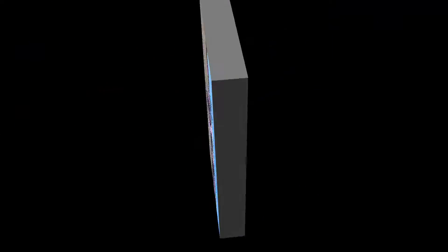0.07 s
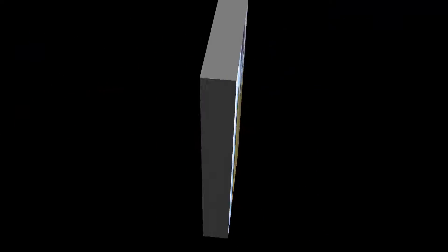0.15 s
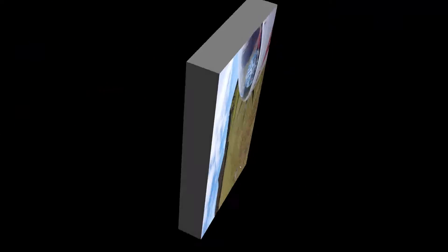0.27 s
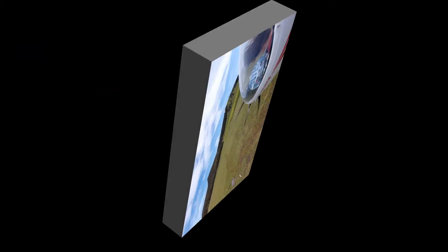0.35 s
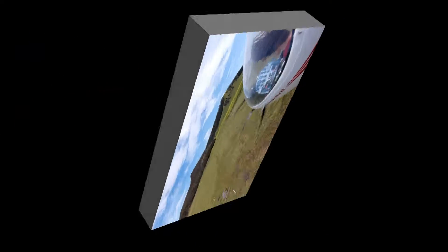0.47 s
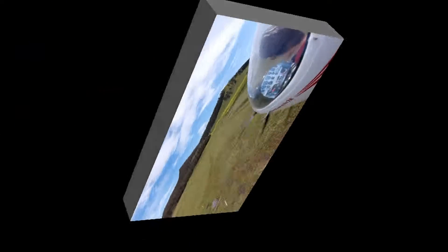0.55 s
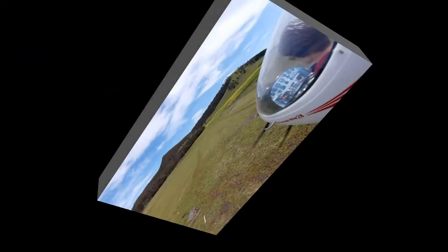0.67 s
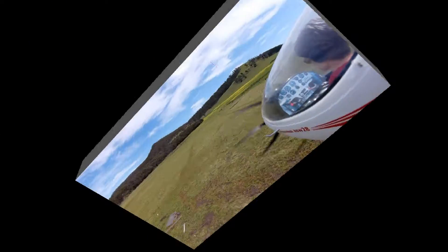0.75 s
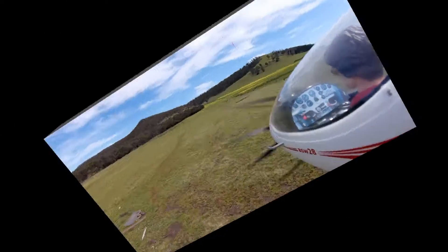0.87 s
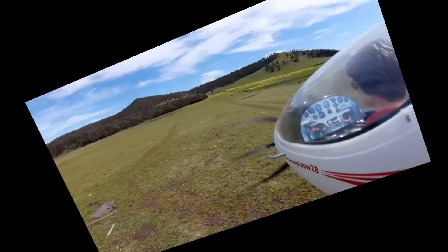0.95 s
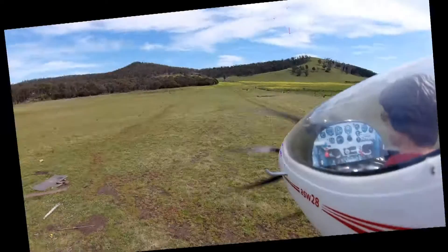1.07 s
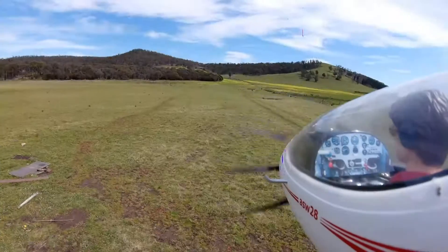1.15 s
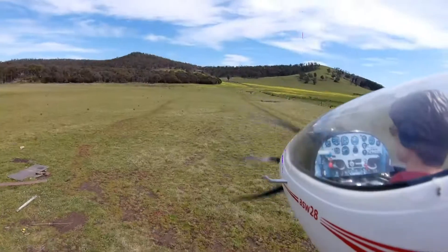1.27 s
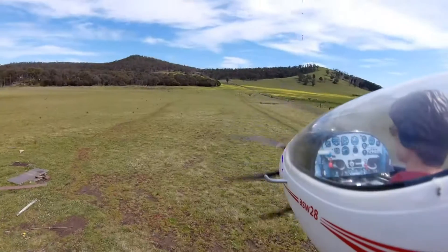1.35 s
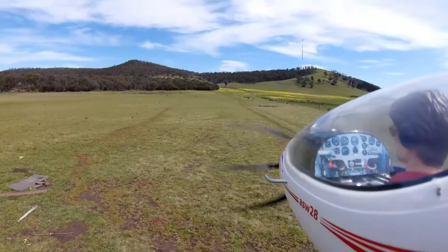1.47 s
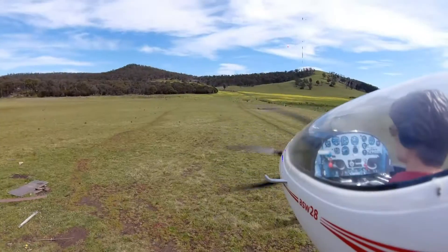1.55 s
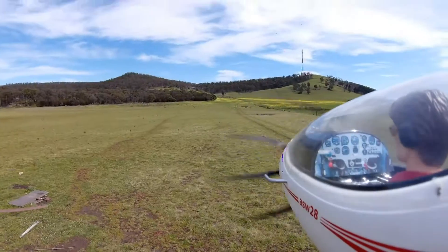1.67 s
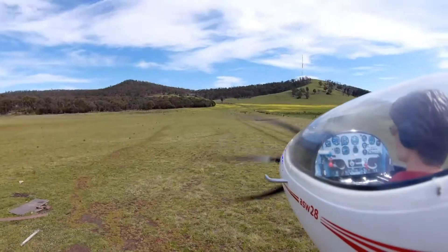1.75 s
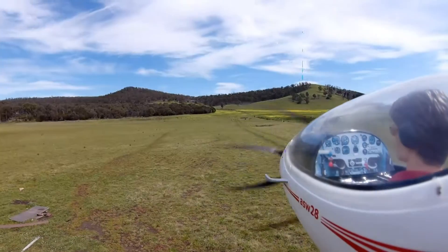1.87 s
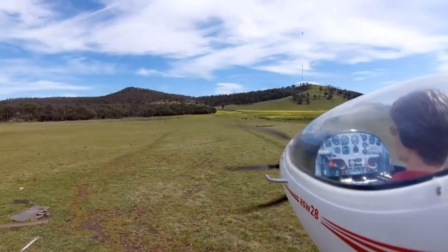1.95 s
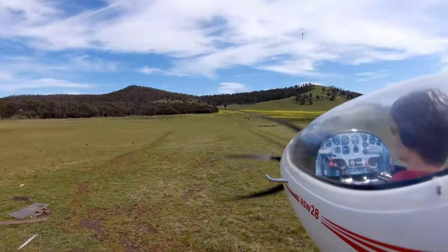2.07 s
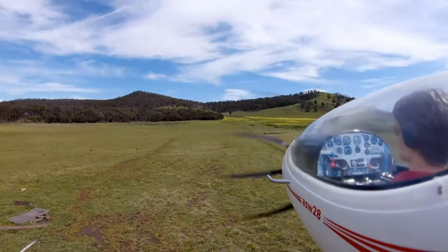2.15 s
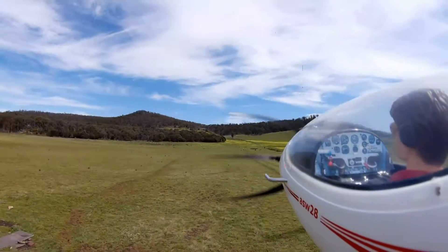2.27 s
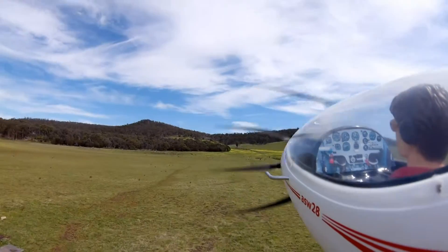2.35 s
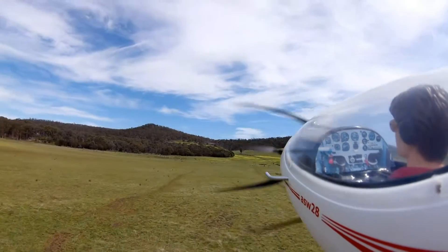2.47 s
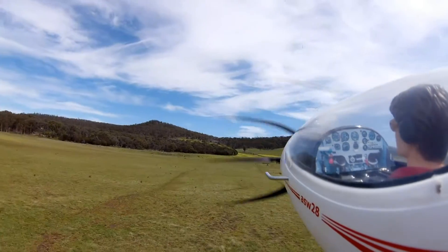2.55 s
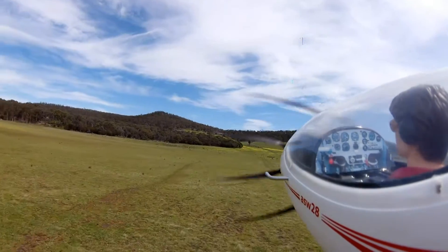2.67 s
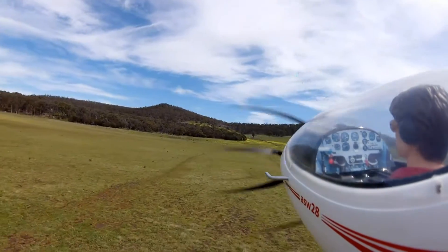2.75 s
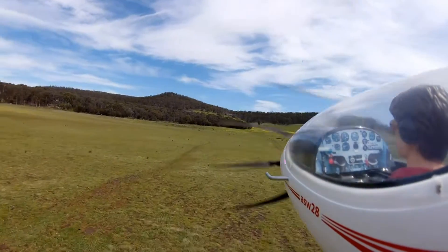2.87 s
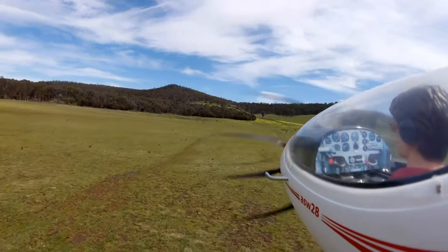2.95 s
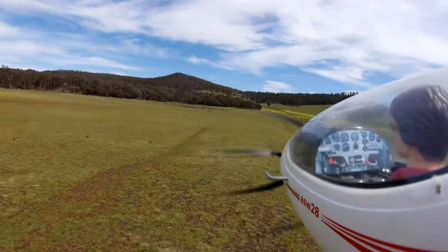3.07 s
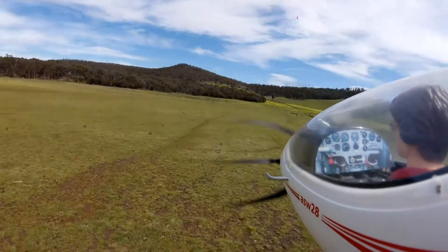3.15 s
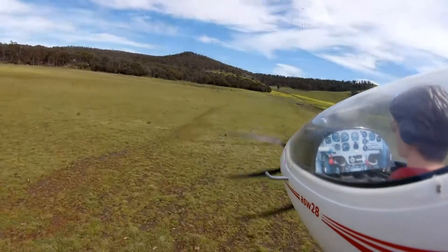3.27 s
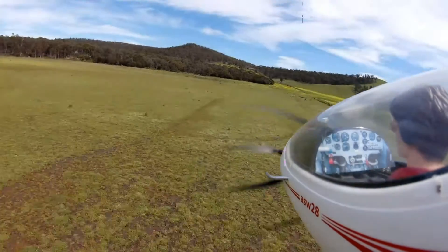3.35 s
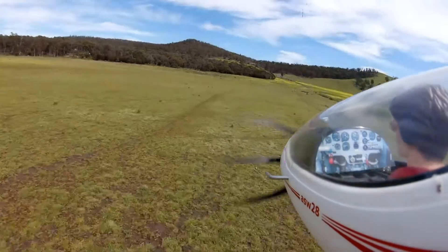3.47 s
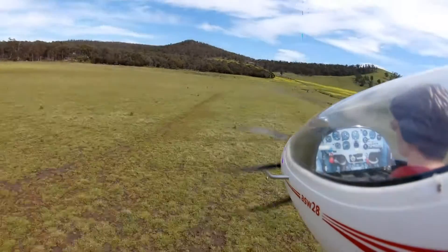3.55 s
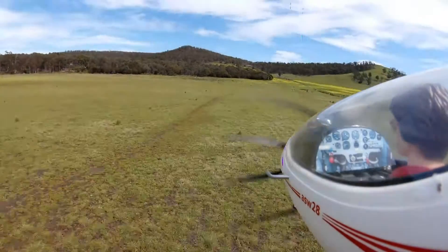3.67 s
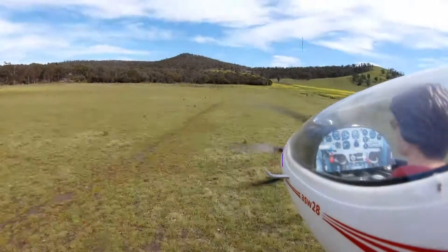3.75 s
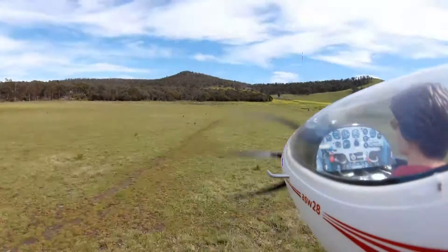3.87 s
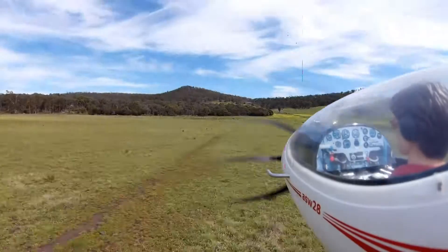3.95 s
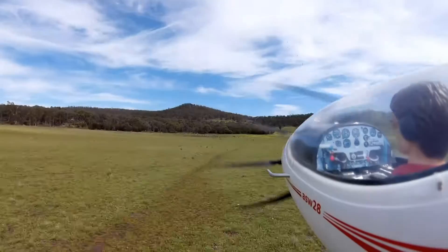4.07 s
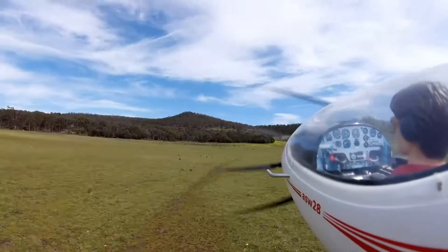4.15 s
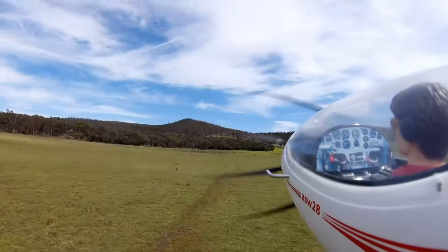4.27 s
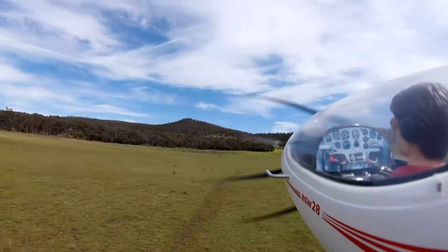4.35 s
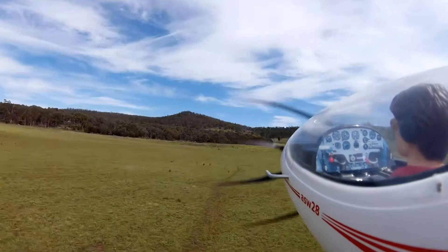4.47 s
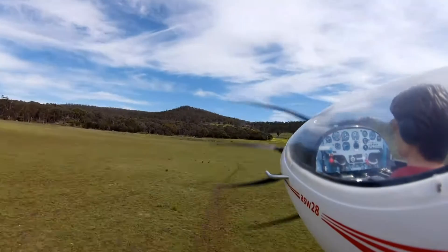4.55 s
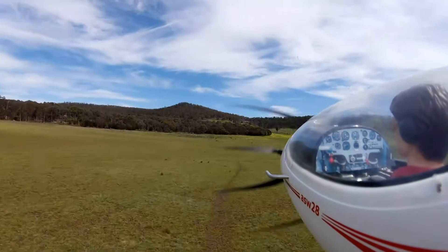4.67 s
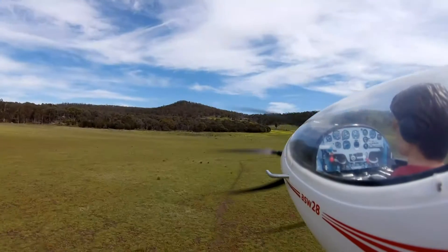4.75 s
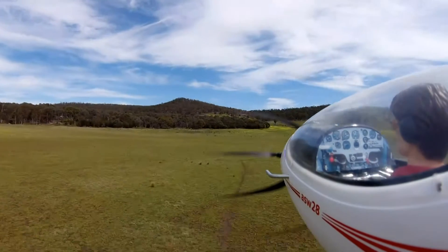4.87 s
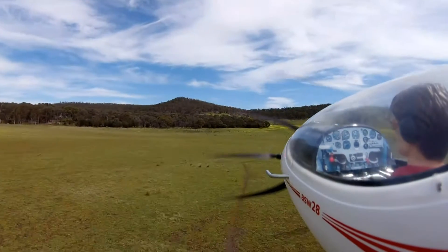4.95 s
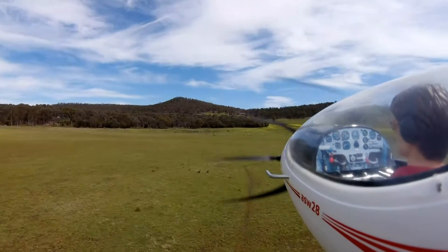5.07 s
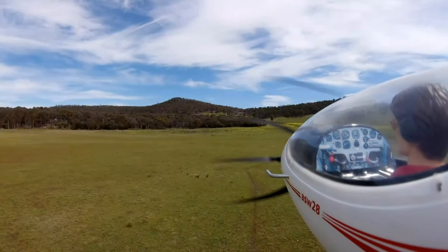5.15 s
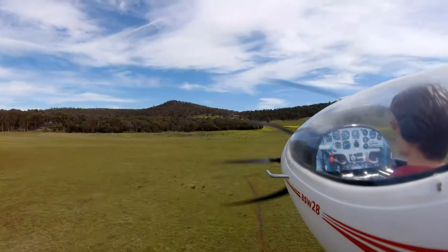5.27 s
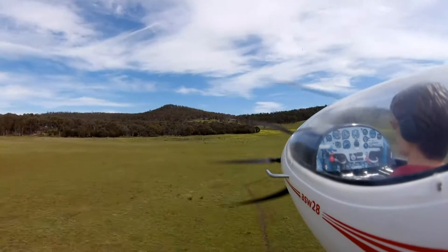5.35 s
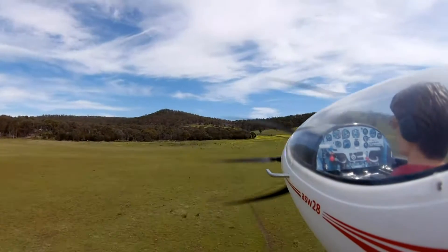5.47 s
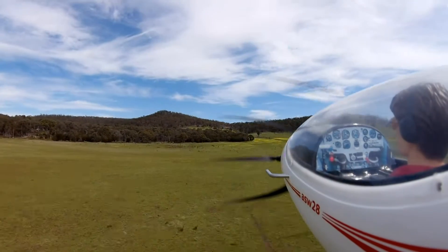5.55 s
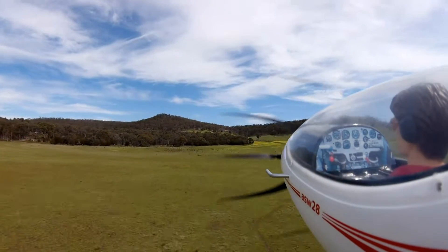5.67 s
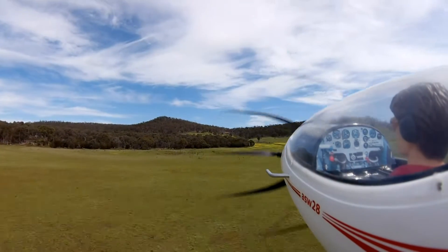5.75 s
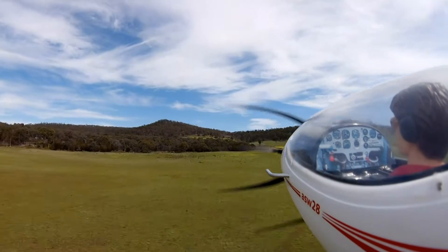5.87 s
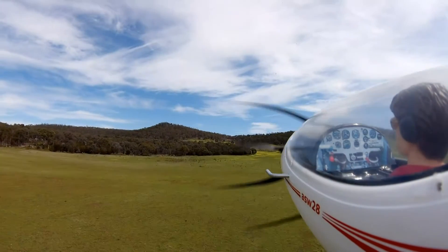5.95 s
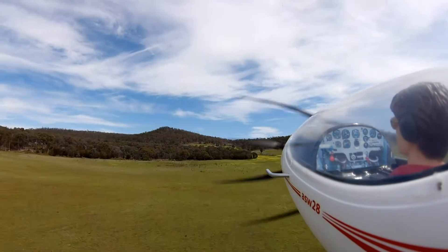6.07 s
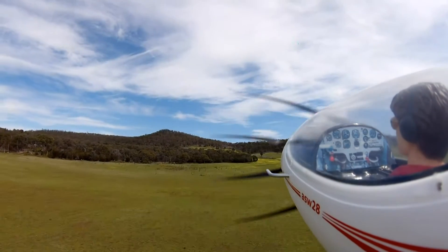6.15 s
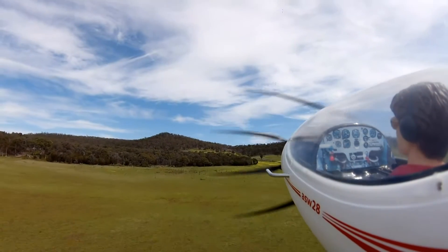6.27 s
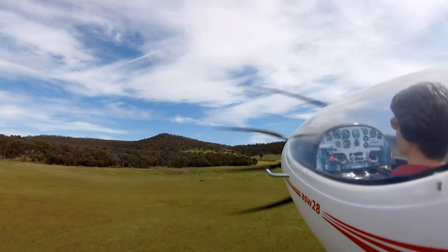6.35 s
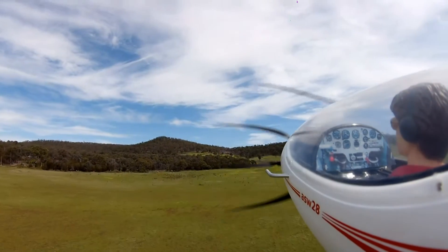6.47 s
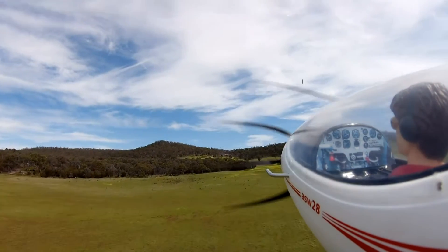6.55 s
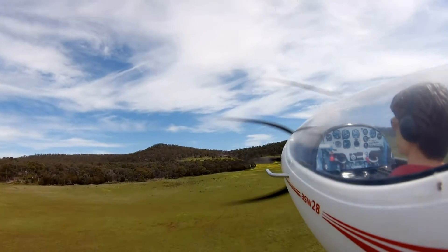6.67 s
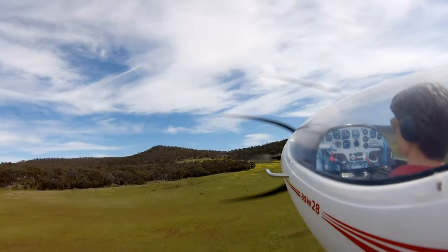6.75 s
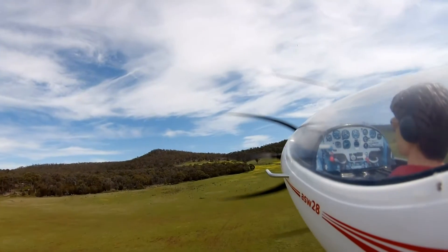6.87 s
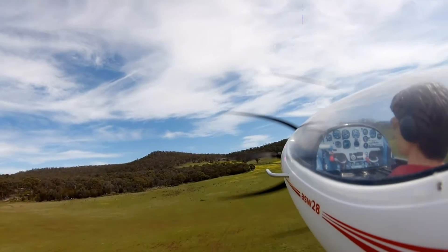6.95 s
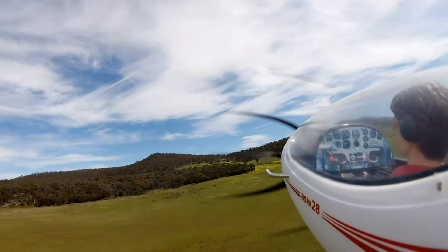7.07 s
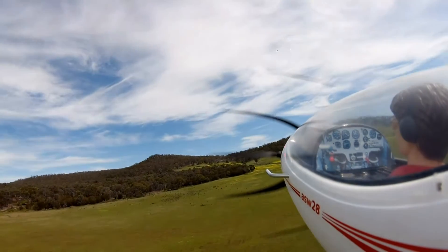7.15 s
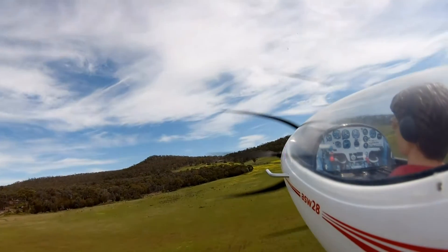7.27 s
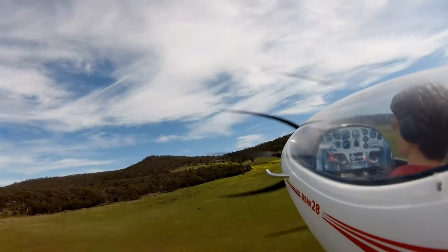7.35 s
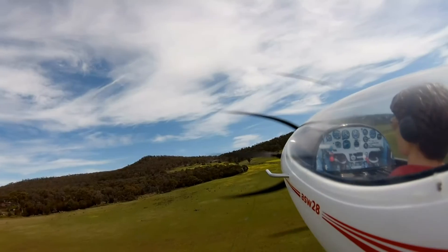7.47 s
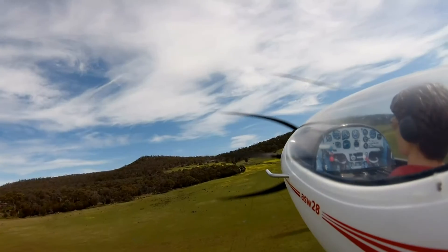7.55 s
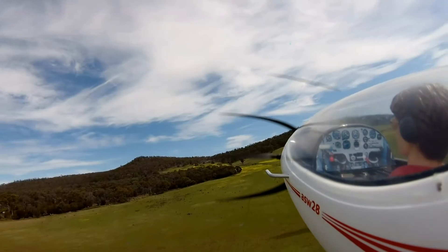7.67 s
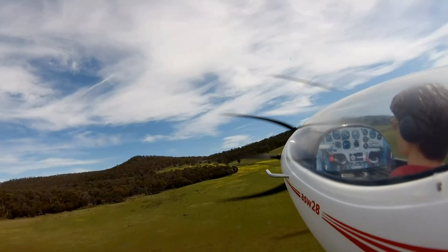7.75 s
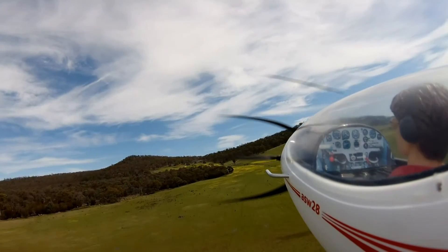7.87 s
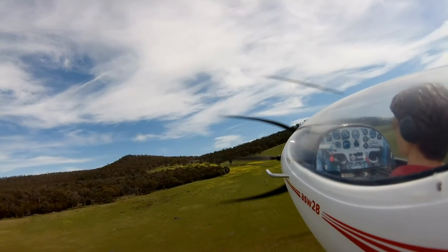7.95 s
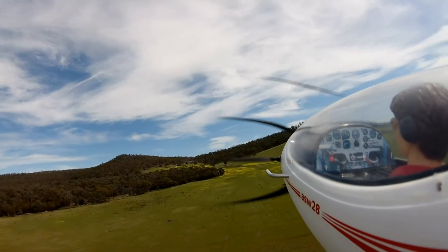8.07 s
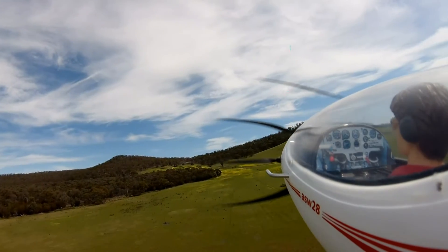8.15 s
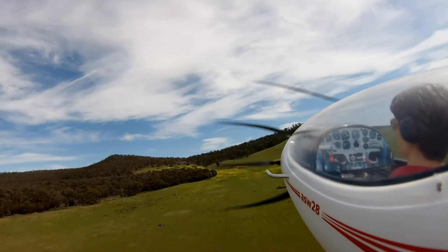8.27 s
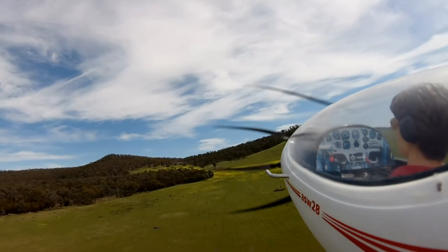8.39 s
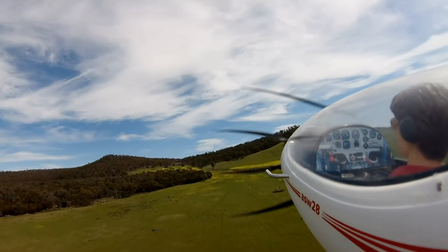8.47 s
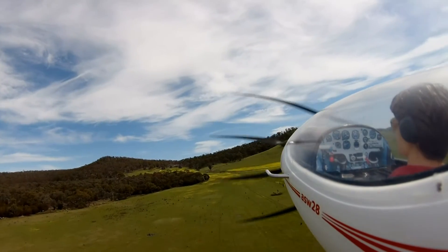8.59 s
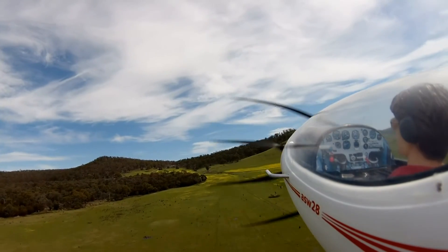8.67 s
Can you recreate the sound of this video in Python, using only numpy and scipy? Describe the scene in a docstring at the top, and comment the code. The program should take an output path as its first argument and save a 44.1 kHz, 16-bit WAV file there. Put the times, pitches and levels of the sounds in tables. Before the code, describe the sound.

A microphone on a model glider's wing, close to its electric propeller, outdoors over grass. From 0 to 2 seconds the stalled blades sputter: rough, lumpy puffs of mid-low noise at about 140 to 150 turns a second, with low flutter, irregular dull pops and bright cracks, densest near 1.5 and 2 seconds. A tiny tick falls near 1.1. Around 2.1 to 2.7 the blades grip, with a hard, rapid rattle and an emerging tone. By 2.9, with a faint soft thump, a harsh, bright buzz sets in at nearly constant pitch, with crisp snaps on top. Until 5.5 choppy gusts make it rasp and waver. It softens abruptly near 5.6 and again around 6.7 to 7, returning each time. Gusty rasp recurs near 6.35, 7.5, 7.8 and the end at 8.7. Blade-pulsed slipstream rush and light hiss continue throughout, above a faint shaft hum.

```python
"""A model glider's electric propeller pulls it off a grass field, heard from a microphone on the wing.
Stalled at first, the blades sputter in noisy puffs and pops; gathering speed they rattle with short cracks,
then settle into a buzz near 150 turns a second: summed orders of the shaft, with crisp tip snaps on top.
Behind it lies the slipstream's rush, noise pulsed by the blades in three bands, and a faint shaft hum.
Gusts roughen the buzz into a rasp; in smooth air it drops away for a moment. Two faint clicks are heard."""
import sys
import numpy as np
from scipy import signal
from scipy.fft import rfft, irfft
from scipy.io import wavfile
from scipy.ndimage import uniform_filter1d

SR = 44100
rng = np.random.default_rng(int(sys.argv[2]) if len(sys.argv) > 2 else 0)


def wav_out(sig):
    """Save sig, one row per channel (or a flat mono array), as 16-bit PCM at SR to the path in sys.argv[1]."""
    wavfile.write(sys.argv[1], SR, np.round(np.clip(np.atleast_2d(sig).T, -1, 1) * 32767).astype(np.int16))


N = 384552
TIME = np.arange(N) / SR  # s

SECOND_BLADE_TURNS = 0.533  # not quite opposite the first blade
PUSH_LAG_TURNS = 0.04  # the blade's smooth push, which makes the low orders, trails its slap


def blade_tones(turns, second, buffet, lull, delay, families, lean_rad=0.92, buffet_waver=0.047,
                dull_db_per_order=-2.5, buffet_turns=0.0052, odd_waver=0.46, sway_turns=0.0048,
                lurch_turns=0.0072, waver=0.11, rough=0.019, shimmer=0.044, lowest_hz=130):
    """Two slaps a turn, unevenly spaced, set odd orders beside even; a late slap shifts high orders most."""
    # eddies meet the blades early or late
    angle = turns + (sway_turns + buffet_turns * buffet) * wander(110) + lurch_turns * wander(11.0)
    response = causal(GRIPPING_COLOUR)
    grid_hz = np.linspace(0, SR / 2, len(response))
    shaft_hz = turns[-1] / TIME[-1]
    out = np.zeros(N)
    for level_db, family in families:
        orders, db = np.transpose(family)
        sizes = gain_of(db) / np.linalg.norm(gain_of(db))
        lines = np.zeros(N)
        for k, size in zip(np.round(orders), sizes):
            pair = 1 + second.mean() * np.exp(-2j * np.pi * k * SECOND_BLADE_TURNS)
            # each slap is a swing of suction and pressure
            lag = np.angle(pair * np.interp(k * shaft_hz, grid_hz, response)) - lean_rad
            # a lull takes the highest orders first
            dulled = gain_of(dull_db_per_order * lull * max(k - 6, 0))
            # gusts reshape the slap and upset the blades' balance
            loose = (waver + buffet_waver * buffet) * np.sqrt(k / 6) + odd_waver * (k % 2) / k
            late = delay * min(k / 6, 1) ** 2 + PUSH_LAG_TURNS * (k < 5)
            strength = dulled * size * np.sqrt(2) * (1 + loose * wander(8.6))
            phase = 2 * np.pi * k * (angle - late) + lag + loose * wander(22)
            lines += strength * np.cos(phase)
        out += gain_of(level_db) * lines * (1 + shimmer * wander(31))
    out = out * (1 + rough * wander(110))
    return out - below(out, lowest_hz)


# blade-passing note, twice the shaft speed, before gusts: [t/s, level/dB]
NOTE = [(2.15, -39.5), (2.27, -26.5), (2.32, -52), (2.6, -30), (2.7, -34), (2.74, -47), (2.8, -38),
        (3.2, -28.5), (3.55, -31), (4.1, -28), (4.48, -30), (4.88, -44.5), (5.0, -34), (5.2, -28),
        (5.48, -40.5), (6.2, -39), (6.55, -45), (7.0, -41), (7.2, -49), (8.72, -45.5)]
# third order, from the blades pushing unequally, before gusts and swells: [t/s, level/dB]
THIRD = [(2.1, -45), (2.329, -38.5), (2.6, -34.5), (3.0, -40), (3.31, -37), (3.55, -51), (3.76, -37),
         (4.1, -44), (4.3, -37.5), (5.2, -36.5), (5.7, -41), (5.95, -36.5), (6.2, -37.5), (6.34, -33.5),
         (6.5, -39), (6.879, -38), (6.98, -50), (7.1, -37.5), (8.72, -39.5)]
# octave of the blade-passing note, before swells and lulls: [t/s, level/dB]
OCTAVE = [(2.29, -49), (2.32, -33.5), (2.42, -41), (2.74, -42.5), (2.86, -37), (3.04, -32.5), (3.45, -29.5),
          (3.85, -34.5), (4.12, -48.5), (4.47, -40), (4.519, -33), (5.4, -34.5), (5.899, -35), (6.3, -32.5),
          (6.698, -35.5), (7.501, -34), (8.72, -34)]
# fifth order, which comes and goes on its own, before gusts and swells: [t/s, level/dB]
FIFTH = [(2.28, -61), (2.36, -48.5), (3.05, -39), (3.45, -47), (3.85, -37.5), (4.1, -40), (4.45, -36.5),
         (4.62, -43), (5.05, -37.5), (5.25, -33.5), (5.55, -46), (5.9, -42), (6.2, -42.5), (6.33, -39.5),
         (8.72, -41)]
# buzz of the high odd orders, setting in with speed, before gusts, swells and lulls: [t/s, level/dB]
BUZZ = [(2.76, -59), (2.851, -39), (3.199, -34.5), (3.5, -53.5), (3.78, -31), (3.95, -35), (4.349, -36),
        (4.7, -32), (4.949, -33.5), (5.25, -36), (5.461, -33.5), (6.099, -31), (8.72, -31)]
# balance within the high even and the high odd family: [order of the shaft speed, relative level/dB]
HIGH_EVEN = [(6, -0.5), (8, -2), (10, -5.5), (12, -13), (14, -18), (16, -22.5)]
HIGH_ODD = [(7, 1), (9, 0), (11, -6), (13, -16), (15, -18), (17, -25)]
# moments when the two blades slap more alike, so the high orders shift from odd to even:
# [middle t/s, length/s, rise of the even level/dB, fall of the odd level/dB]
SWELLS = [(2.886, 0.093, 3, 5), (3.342, 0.37, 2, 3.5), (3.623, 0.17, 5, -0.5), (4.1, 0.27, 5, -2),
          (4.495, 0.038, -0.5, 2), (5.087, 0.064, 2, 5), (5.534, 0.086, 7, 1), (5.86, 0.27, 8, 0),
          (6.511, 0.11, 7, 3), (6.703, .17, 8.5, 4), (7.07, .24, 8.5, 6), (7.277, 0.19, 7.5, 2),
          (7.778, 0.15, 2.5, -1), (8.118, 0.11, 0, -0.5), (8.322, 0.15, 9, 0.5), (8.44, 0.078, 4, 0.5)]
EVEN_ROLLING_DB, EVEN_FLYING_DB = -48.5, -40.5  # high even orders, before and after the slaps sharpen
LULL_EVEN_DB, LULL_ODD_DB, LULL_OCTAVE_DB = -8, -17, -11.5  # what a full lull takes from the tones
GUST_NOTE_DB = -37.5  # blade-passing note that a gust of strength 1 raises by itself
GUST_LOW_ODD_DB, GUST_BUZZ_DB = 2, -1.5  # what such a gust adds to the other tones
SWELL_OCTAVE, SWELL_LOW_ODD = 0.29, -0.11  # dB for each dB that the high even orders rise


def tone_levels(gust, lull, buffet, buffet_slap_db=3.5):
    """(level dB, orders) of each family: gusts feed the low tones, lulls take the slap from the high ones."""
    note, third, octave, fifth, buzz = (curves(rows)[0] for rows in (NOTE, THIRD, OCTAVE, FIFTH, BUZZ))
    even = np.interp(TIME, [2.78, 2.85], [EVEN_ROLLING_DB, EVEN_FLYING_DB])
    even_rise = bumps((s, length, rise) for s, length, rise, fall in SWELLS)
    odd_fall = bumps((s, length, fall) for s, length, rise, fall in SWELLS)
    slap = buffet_slap_db * buffet
    low_odd = GUST_LOW_ODD_DB * gust + SWELL_LOW_ODD * even_rise
    note_gain = gain_of(note) + gain_of(GUST_NOTE_DB) * abs(gust)
    return [(20 * np.log10(note_gain), [(2, 0)]),
            (third + low_odd, [(3, 0)]),
            (fifth + low_odd, [(5, 0)]),
            (octave + SWELL_OCTAVE * even_rise + LULL_OCTAVE_DB * lull ** 2, [(4, 0)]),
            (even + slap + even_rise + LULL_EVEN_DB * lull, HIGH_EVEN),
            (buzz + slap - odd_fall + GUST_BUZZ_DB * gust + LULL_ODD_DB * lull, HIGH_ODD)]


def slap_delay(gust, buffet, usual_turns=0.045, gust_turns=0.065, flip_turns=0.05, flip_hz=17, sharp_db=7):
    """Lateness of the slap in turns: least in a swell, late in a gust, flipping to and fro in choppy air."""
    sharp = np.clip(bumps((s, length, rise) for s, length, rise, fall in SWELLS) / sharp_db, 0, 1)
    flips = np.tanh(2 * wander(flip_hz))
    return usual_turns * (1 - sharp) + gust_turns * gust + flip_turns * buffet ** 2 * flips


# shaft speed: [t/s, turns per second/Hz]
SPEED = [(0, 141), (0.6, 138), (1.15, 148), (1.7, 146.5), (2.28, 149.9), (2.6, 147.8), (2.76, 149.7),
         (2.96, 148.6), (3.72, 149.2), (3.92, 150.6), (4.24, 149.1), (4.76, 150.1), (5.6, 150.3),
         (6.2, 150.8), (7.1, 150.0), (7.65, 150.4), (7.85, 149.8), (8.72, 149.6)]


def shaft_turns():
    """Turns made by the shaft so far: its speed added up over time."""
    return np.cumsum(curves(SPEED)[0]) / SR


# state of the flow on the blades: [t/s, second blade's share, weakening of every other turn 0-1,
# timing scatter/s, grip 0-1]
FLOW = [(0, 0.21, 0.84, 0.0016, 0.24), (1.1, 0.19, 0.42, 0.0012, 0.04), (1.6, 0.3, 1, 0.00059, 0.06),
        (2, 0.36, 0.9, 0.00079, 0.24), (2.3, 0.17, 0.15, 0.00053, 0.87), (2.7, 0.18, 0.2, 0.00048, 0.8),
        (2.95, 0.93, 0.1, 0.00036, 0.99), (8.72, 0.55, 0.11, .00015, 0.93)]


def blade_flow():
    """How unequal, ragged and firmly gripped the flow over the blades is at each moment."""
    return np.clip(curves(FLOW), 0, 1)


# gusts through the propeller disc: [middle t/s, length/s, strength, rise of the hiss level/dB]
GUSTS = [(2.39, 0.23, 0.4, 0), (2.93, 0.13, 0.6, 0.5), (3.093, 0.13, 0.64, 1.5), (3.506, 0.17, 0.58, 0.5),
         (3.71, 0.1, 0.26, 0.5), (4.562, 0.15, 0.4, 0), (4.763, 0.07, 0.8, 0), (4.864, 0.076, 0.83, -0.5),
         (4.998, 0.11, 0.7, 0.5), (5.336, 0.045, 0.66, 2.5), (6.352, 0.2, 0.88, 2), (7.385, .05, 0.14, 1.5),
         (7.544, .075, .9, 1.5), (7.767, 0.21, 0.74, 2), (8.003, 0.048, 0.42, 1), (8.21, 0.063, 0.13, 0),
         (8.647, 0.17, 0.82, 1.5)]


def gusts():
    """Strength of the gusts, each rising fast, holding and dropping away."""
    return bumps((s, length, strength) for s, length, strength, hiss_db in GUSTS)


# lulls, when the blades meet smooth air and slap less: [start t/s, fade/s, end t/s, return/s, depth 0-1]
LULLS = [(5.552, 0.022, 5.722, 0.016, 0.77), (5.862, .008, 5.95, .008, 0.1),
         (6.463, .013, 6.53, 0.02, 0.13), (6.745, 0.064, 6.96, 0.036, 0.76), (6.91, .05, 7.1, 0.039, 0.53)]


def lulls(ragged=0.3, ragged_hz=24):
    """Each lull fades in, holds and lets go; half-way in or out, the slap catches and slips."""
    calm = np.zeros(N)
    for start, fade, end, back, depth in LULLS:
        calm += depth * np.clip(np.minimum((TIME - start) / fade, (end - TIME) / back), 0, 1)
    return np.clip(calm + 2 * ragged * calm * (1 - calm) * wander(ragged_hz), 0, 1)


# buffeting, when choppy air throws the slaps off their beat: [t/s, strength 0-1]
BUFFET = [(2.8, 0.56), (3, 0.66), (3.7, 0.52), (3.95, 0.24), (4.45, 0.48), (4.6, 0.9), (4.9, 0.76),
          (5.05, 0.7), (5.5, 0.46), (5.6, 0.1)]


def buffeting():
    """Strength of the choppy air."""
    return curves(BUFFET)[0]


# the leading blade striking its own wake, loudest as the plane starts to roll: [t/s, typical peak level/dB]
CRACKS = [(0, -38), (1.2, -34), (2.1, -28), (2.29, -35), (2.33, -20), (2.68, -21), (2.8, -30), (3.2, -42),
          (8.72, -46)]
# colour of such a crack: [f/Hz, relative level/dB per Hz]
CRACK_COLOUR = [(20, -59), (110, -29.5), (300, -2), (600, 3.5), (1400, -3.5), (2100, -18.5), (3200, -33),
                (5000, -50.5), (6500, -75.5), (14000, -90.5)]


def wake_cracks(turns, scatter, spread_db=3, scatter_share=0.6):
    """Uneven cracks of suction: a sparse crackle in the stall, a hard rattle as the blades begin to grip."""
    return -strikes(turns, curves(CRACKS)[0], scatter_share * scatter, CRACK_COLOUR, spread_db)


# colour of the crisp snap of a blade tip: [f/Hz, relative level/dB per Hz]
SNAP_COLOUR = [(20, -60.5), (1100, -14.5), (2000, -3), (2550, -4.5), (3300, -10), (4600, -23),
               (6400, -55.5), (14000, -70)]


def tip_snaps(turns, scatter, gust, lull, buffet, snap_db=-43, buffet_db=6, gust_db=3, lull_db=-14,
              spread_db=3, scatter_share=0.11):
    """Crisp snaps on top of the buzz once the plane has speed, stronger in choppy air and weak in a lull."""
    level_db = snap_db + buffet_db * buffet + gust_db * gust + lull_db * lull
    flying = np.interp(TIME, [2.7, 3.8], [0, 1])
    return flying * strikes(turns, level_db, scatter_share * scatter, SNAP_COLOUR, spread_db)


def strikes(turns, level_db, scatter, colour, spread_db):
    """One short, evenly shaped pulse a turn, each of its own strength and a little early or late."""
    at = np.searchsorted(np.maximum.accumulate(turns), np.arange(1, int(turns[-1])))
    early, strength = np.clip(rng.standard_normal((len(at), 2)), -2, 1.3).T
    place = np.clip(at + (scatter[at] * early * SR).astype(int), 0, N - 1)
    kicks = np.bincount(place, gain_of(level_db[at] + spread_db * strength), N)
    pulse = np.fft.fftshift(irfft(abs(causal(colour))))
    return signal.oaconvolve(kicks, pulse / pulse.max(), "same")


# single hard slaps of a stalled blade: [t/s, peak level/dB, brightness f/Hz]
SLAPS = [(0.497, -25, 900), (0.749, -25, 1200), (0.913, -22, 3000), (1.374, -25, 1200), (1.472, -17, 4000),
         (1.545, -23, 700), (1.583, -19.5, 2000), (1.624, -21, 1400), (1.866, -22, 1800),
         (1.983, -21, 3000), (2.044, -19.5, 1800), (2.071, -21, 1200), (2.091, -21, 1200),
         (2.22, -21, 1500), (2.234, -20, 1000), (2.26, -23, 1500)]


def slaps():
    """Now and then a stalled blade strikes one large eddy, with a dull pop or a bright crack."""
    body = irfft(causal(STALLED_COLOUR))
    out = np.zeros(N)
    for s, db, top_hz in SLAPS:
        crack = signal.lfilter(*signal.butter(1, top_hz, fs=SR), body)
        at = round(s * SR)
        out[at:at + len(crack)] += gain_of(db) * crack / abs(crack).max()
    return out


def puffs(turns, second, skip, scatter, grip, spread_db=-1.0, stalled_s=0.004, gripping_s=0.0012):
    """Strength of the eddies torn off at each blade pass: long puffs in the stall, short ones in flight."""
    count = np.arange(int(turns[-1]))
    kicks = np.zeros(N)
    for place, share in ((0, np.ones(N)), (SECOND_BLADE_TURNS, second)):
        at = np.minimum(np.searchsorted(turns, count + place), N - 1)
        early, strength = np.clip(rng.standard_normal((len(at), 2)), -2, 2).T
        uneven = gain_of(spread_db * strength * (1 - grip[at]))
        size = share[at] * (1 - skip[at] * (count % 2)) * uneven
        moved = np.clip(at + (scatter[at] * early * SR).astype(int), 0, N - 1)
        kicks += np.bincount(moved, size, N)

    def dying_away(decay_s):
        return steadied(signal.lfilter([1], [1, -np.exp(-1 / (decay_s * SR))], kicks))

    return (1 - grip) * dying_away(stalled_s) + grip * dying_away(gripping_s)


# colour of the turbulence with stalled and with gripping blades: [f/Hz, relative level/dB per Hz]
STALLED_COLOUR = [(20, -112), (50, -101), (100, -80.5), (140, -73.5), (260, -58.5), (520, -60), (820, -63),
                  (1400, -66), (1700, -71.5), (2000, -79.5), (3200, -89.5), (4700, -99), (5600, -110),
                  (6400, -125), (12000, -138)]
GRIPPING_COLOUR = [(20, -125), (50, -108), (100, -84.5), (200, -69), (350, -62.5), (1100, -56.5),
                   (1550, -60), (2000, -75), (2450, -76.5), (2800, -82.5), (3200, -83.5), (4750, -91.5),
                   (5900, -109), (6600, -121), (7500, -121), (8700, -116.5), (11000, -133), (12500, -131),
                   (14500, -140)]
# turbulent air, before gusts, lulls, grip and sags: [t/s, body level/dB, rasp level/dB, hiss level/dB]
AIR = [(0, -35.5, -39, -54.5), (1.7, -35.5, -38, -53.5), (2.08, -32, -37.5, -52), (2.3, -35, -38.5, -51),
       (2.7, -35.5, -37.5, -51.5), (2.85, -34, -32.5, -50), (3.3, -37, -31.5, -49.5),
       (3.95, -38.5, -34.5, -46.5), (4.85, -37, -32.5, -47.5), (5.35, -37.5, -33.5, -47),
       (5.75, -37, -38.5, -48), (6.25, -37.5, -37, -46.5), (6.8, -38, -41, -48.5),
       (8.72, -37.5, -39, -47.5)]
# brief sags in the roar of the stalled blades: [middle t/s, length/s, level change/dB]
SAGS = [(.44, 0.081, -2), (.64, 0.022, -5.5), (1.21, 0.09, -2), (1.57, 0.014, 0), (2.03, 0.025, -2),
        (2.28, 0.068, -2.5)]
GUST_RASP_DB = 7.5  # what a gust of strength 1 adds to the rasp


def turbulence(puff, grip, gust, lull, shift_db, surge_db=0.85, rasp_lull_db=1.5, hiss_lull_db=-2.0,
               rasp_grip_db=-2.0, stalled_wash=0.85, flying_wash=0.48, hiss_wash=3,
               pulsing_top_hz=3100, body_top_hz=750, rasp_top_hz=2000):
    """Noisy puffs over a wash of air; the hiss on top pulses less, and gusts raise the rasp most."""
    def coloured(drive):
        stalled, gripping = (steadied(signal.oaconvolve(drive, irfft(causal(colour)))[:N])
                             for colour in (STALLED_COLOUR, GRIPPING_COLOUR))
        return (1 - grip) * stalled + grip * gripping

    noise = rng.standard_normal(N)
    wash = stalled_wash + (flying_wash - stalled_wash) * grip
    rough = coloured((puff + wash) * noise)
    smooth = coloured((puff + hiss_wash) * noise)
    air = smooth + below(rough - smooth, pulsing_top_hz)
    body = below(air, body_top_hz)
    rasp = below(air - body, rasp_top_hz)
    hiss = air - body - rasp
    body_db, rasp_db, hiss_db = curves(AIR)
    rasp_db = rasp_db + GUST_RASP_DB * gust + shift_db + rasp_lull_db * lull + rasp_grip_db * grip
    hiss_rise = bumps((s, length, db) for s, length, strength, db in GUSTS)
    hiss_db = hiss_db + hiss_rise + hiss_lull_db * lull
    surge = gain_of(bumps(SAGS) + surge_db * (1 - grip) * wander(14))  # the stalled flow comes in lumps
    bands = ((body_db, body), (rasp_db, rasp), (hiss_db, hiss))
    return surge * sum(gain_of(db) * steadied(band) for db, band in bands)


# once-a-turn hum of the shaft: [t/s, level/dB]
HUM = [(0, -65), (1.9, -61), (2.05, -45), (2.7, -44), (3.15, -57.5), (8.72, -57.5)]
# flutter of the stalled blades, before grip fades it: [multiple of the shaft speed, level/dB]
FLUTTER = [(.5, -58), (1, -54), (1.5, -48.5), (2, -44.5)]


def shaft(turns, grip, rough=0.57):
    """A low hum, and an unsteady flutter that repeats every second turn until the air grips."""
    hum = gain_of(curves(HUM)[0]) * np.sin(2 * np.pi * turns)
    flutter = np.zeros(N)
    for k, db in FLUTTER:
        phase = np.pi * np.round(2 * k) * turns + rough * wander(4.8)
        flutter += gain_of(db) * (1 + rough * wander(13)) * np.cos(phase)
    return np.sqrt(2) * (hum + (1 - grip) ** 3 * flutter)


# two faint clicks: [t/s, peak level/dB, length/s]
CLICKS = [(1.132, -34.5, 0.000025), (2.94, -39, 0.0025)]


def clicks():
    """Two faint clicks, a tiny dry tick and a soft low thump, each a single bell-shaped pulse."""
    return sum(gain_of(db) * np.exp(-((TIME - s) / length) ** 2) for s, db, length in CLICKS)


def gain_of(db):
    """Decibels to amplitude."""
    return 10 ** (np.asarray(db) / 20)


def curves(rows):
    """Each column of a table of (t/s, values), at every sample."""
    s, *columns = np.transpose(rows)
    return [np.interp(TIME, s, column) for column in columns]


def bumps(rows, edge_s=0.014):
    """The flow switches over quickly, holds and switches back, for each (middle s, length s, height)."""
    return sum(height * np.clip((length / 2 - abs(TIME - s)) / edge_s + 0.5, 0, 1)
               for s, length, height in rows)


def steadied(x, size=6000):
    """Takes the slow level out of a sound, leaving its grain."""
    power = uniform_filter1d(uniform_filter1d(x ** 2, size), size)
    return x / np.sqrt(abs(power) + 1e-20)


def wander(hz):
    """Random drift of unit size, mostly slower than hz."""
    f = np.fft.rfftfreq(N // 32, 32 / SR)
    x = irfft(rfft(rng.standard_normal(N // 32)) / (1 + (f / hz) ** 4))
    return np.interp(TIME, np.linspace(0, TIME[-1], len(x)), x / x.std())


def causal(points, size=4096):
    """Complex response, 0 to SR / 2, of a body with this spectrum that rings only after it is struck."""
    f, db = np.transpose(points)
    grid_hz = abs(np.fft.fftfreq(size, 1 / SR))
    db = np.interp(np.log(grid_hz + 1), np.log(f), db - db.max())
    return np.exp(np.conj(signal.hilbert(np.log(gain_of(db)))))[:size // 2 + 1]


def below(x, hz):
    """The part of a sound under hz."""
    f = np.fft.rfftfreq(2 * N, 1 / SR)
    return irfft(rfft(x, 2 * N) / (1 + (f / hz) ** 8))[:N]


def scene(buffet_rasp_db=-5.5):
    """The shaft's angle drives the tones and the puffs alike; gusts and lulls act on both."""
    turns = shaft_turns()
    second, skip, scatter, grip = blade_flow()
    gust, lull, buffet = gusts(), lulls(), buffeting()
    bite = np.interp(TIME, [1.95, 2.3], [0, 1])  # the tones form as the plane starts to roll
    delay = slap_delay(gust, buffet)
    families = tone_levels(gust, lull, buffet)
    tones = bite * blade_tones(turns, second, buffet, lull, delay, families)
    snaps = tip_snaps(turns - delay, scatter, gust, lull, buffet)
    crackle = wake_cracks(turns, scatter) + snaps + slaps()
    puff = puffs(turns, second, skip, scatter, grip)
    air = turbulence(puff, grip, gust, lull, buffet_rasp_db * buffet)
    return (tones + crackle + air + shaft(turns, grip) + clicks())[None]


def record(dry, notch_hz=698, notch_width_hz=40, edge_hz=14700):
    """The microphone on the wing has a narrow notch; then a soft start and stop, and an upper band limit."""
    notched = signal.lfilter(*signal.iirnotch(notch_hz, notch_hz / notch_width_hz, SR), dry)
    eased = notched * signal.windows.tukey(N, 0.001)
    band_limit = signal.firwin(255, edge_hz, window=("kaiser", 9), fs=SR)
    return signal.oaconvolve(eased, band_limit[None], "same")


dry = scene()
out = record(dry)
wav_out(out)
```